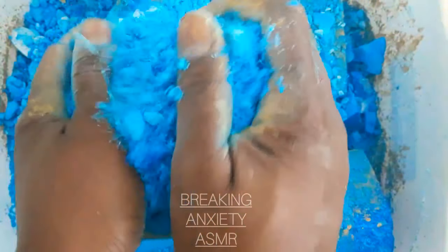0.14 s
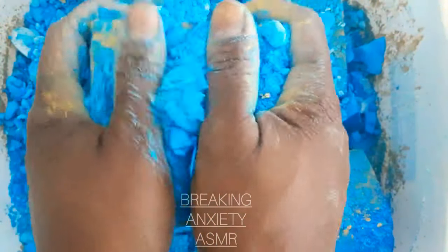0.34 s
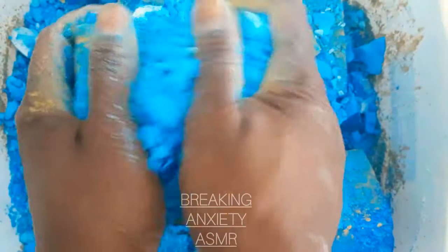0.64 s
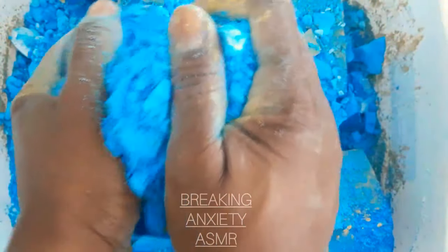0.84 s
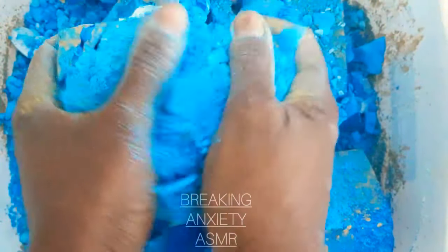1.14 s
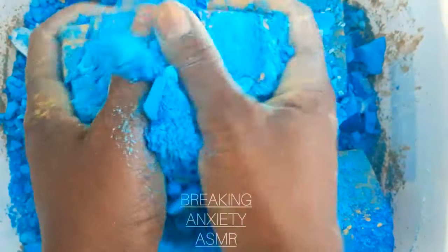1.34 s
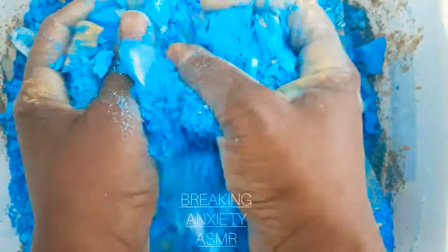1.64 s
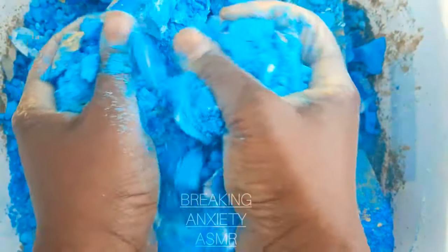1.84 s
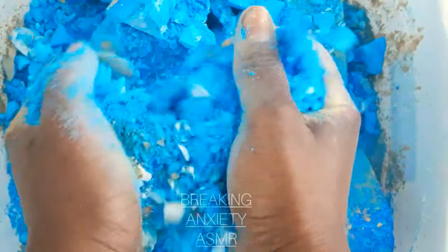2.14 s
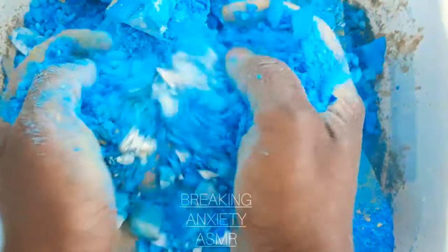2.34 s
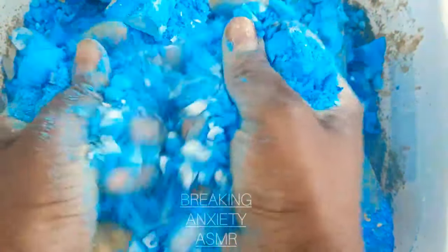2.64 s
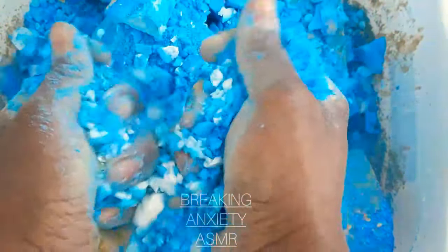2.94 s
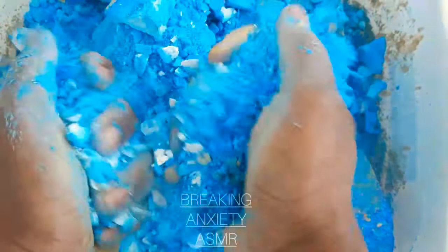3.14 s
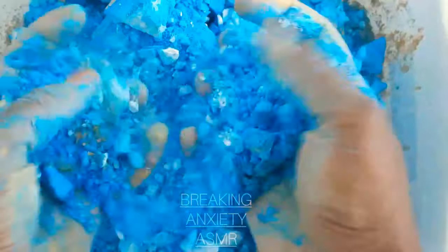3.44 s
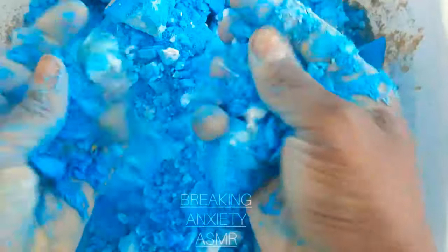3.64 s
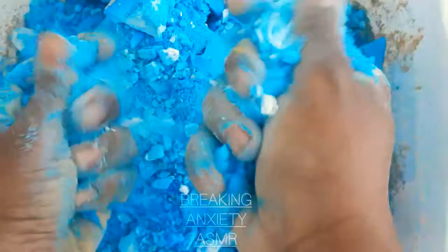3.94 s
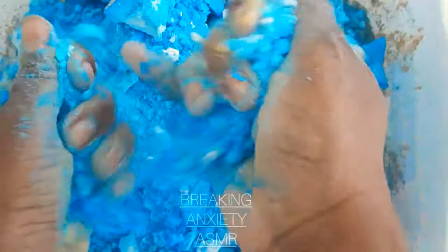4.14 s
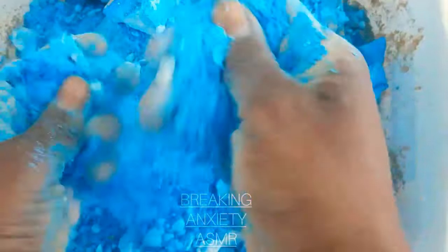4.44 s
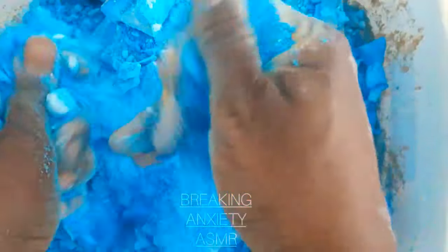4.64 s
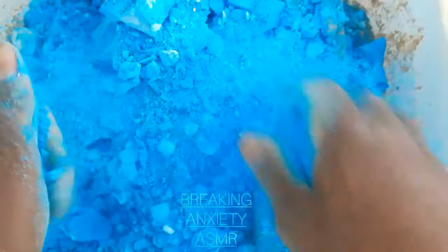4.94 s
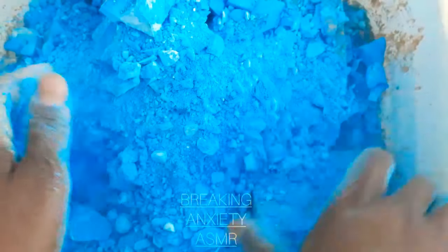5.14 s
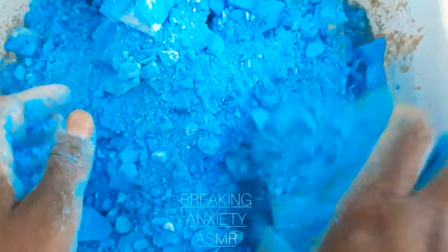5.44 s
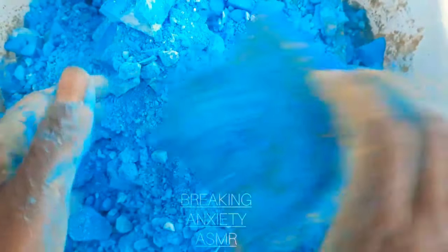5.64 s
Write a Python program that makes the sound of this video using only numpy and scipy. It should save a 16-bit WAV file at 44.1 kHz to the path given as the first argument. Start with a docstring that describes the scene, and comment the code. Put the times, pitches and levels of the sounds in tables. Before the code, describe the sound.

Two hands crush dry chalk blocks close to the microphone in a quiet room. Sharp, brittle snaps and gritty crunching come in irregular squeezes, busiest during the first two seconds. Lumps knock into a plastic tray below, and showers of crumbs patter with a soft low rumble. The crunching then grows lighter, with scattered cracks, a loud knock midway and a cluster of thuds near the end.

```python
"""A quiet room, the microphone close to two hands crushing dry chalk blocks over a plastic tray.
The chalk splits with sharp snaps and grinds into a crackle of grit; a few hard chips ring.
Lumps drop into the tray and knock on it, and the rain of small crumbs keeps its bottom rumbling.
Quick echoes come off the hands and the tray walls, with a faint room tail and hush behind."""
import sys
import numpy as np
from scipy import signal
from scipy.fft import rfft, irfft
from scipy.io import wavfile

SR = 44100
rng = np.random.default_rng(int(sys.argv[2]) if len(sys.argv) > 2 else 0)


def generate_wav(signal):
    """Clip the signal to [-1, 1] and save it as 16-bit WAV at the path in sys.argv[1]."""
    frames = np.transpose(np.atleast_2d(signal))
    scaled = np.clip(frames, -1, 1) * 32767
    pcm = np.round(scaled).astype(np.int16)
    wavfile.write(sys.argv[1], SR, pcm)


N = 254898
TIME = np.arange(N) / SR
STEPS = np.arange(0, N / SR + .002, .002)  # 2 ms grid for slow movements


def fracture(hz, cycles=0.5, splinter_db=-13, splinter_s=0.00095, splinter_width=1.7):
    """A crack runs in three quick steps, each a short click, trailed by splinters of like pitch."""
    t = np.arange(700) / SR
    gap, step_pitch, phase = rng.random((3, 3, 1))
    gap_s = .0003 + .0009 * gap
    since = np.maximum(t - np.cumsum(gap_s, axis=0) + gap_s[0], 0)
    turns = since * hz * 2 ** (.6 * (step_pitch - .5))
    age = turns / cycles
    envelopes = np.array([[.8], [.5], [.3]]) * (age * np.exp(1 - age)) ** 2
    clicks = envelopes * np.sin(2 * np.pi * (turns + phase))
    band = signal.butter(1, [hz / splinter_width, min(hz * splinter_width, .45 * SR)], "bandpass", fs=SR)
    splinters = unit(signal.lfilter(*band, rng.laplace(size=len(t)))) * np.exp(-t / splinter_s)
    return clicks.sum(0) + amp(splinter_db) * splinters


def snaps(chip_level_db, chip_count=300, chip_hz=3900, chip_octaves=0.72, chip_spread_db=9):
    """Loud brittle fractures, and between them small chips that break off as hard as the hands press."""
    # The loudest fractures. Each row: start in seconds, level in dB, pitch in Hz.
    breaks = [(.002, -2.5, 6000), (0.0553, -4, 5050), (.0611, 1, 3600), (0.3172, -4.5, 3960),
              (0.3484, -10.5, 3860), (0.4127, -13, 5570), (.4404, -6.5, 3660), (.5011, -8.5, 5440),
              (0.615, -15, 3830), (.6319, -14, 3900), (0.6545, -15.5, 4450), (0.6686, -14, 4100),
              (.69, -12, 3930), (0.711, -13.5, 4400), (0.7338, -10, 3700), (0.7712, -9, 4240),
              (0.809, -20.5, 2900), (.8376, -19.5, 3500), (.9176, -25, 4160), (0.9413, -12, 4200),
              (0.9722, -6.5, 3370), (1.014, -14.5, 4030), (1.1364, -17, 5650), (1.277, -20, 5100),
              (1.3726, -13, 5100), (1.4908, -6.5, 7900), (1.6351, -12.5, 5200), (1.726, -6, 2840),
              (1.831, -5, 3350), (1.8739, -4.5, 4050), (1.9698, -9.5, 4400), (2.06, -7, 5300),
              (2.0689, -4, 5500), (2.1507, -10.5, 5900), (2.7153, -22, 4820), (2.7872, -6.5, 6140),
              (2.8844, -9.5, 2310), (3.032, -12, 3770), (3.101, -15, 5050), (3.6376, -27, 2600),
              (3.8432, -18, 4830), (3.932, -10.5, 4900), (4.027, -16.5, 3100), (4.1495, -17, 5100),
              (4.2497, -21.5, 3800), (4.8029, -15, 4100), (4.858, -17.5, 2700), (5.137, -16, 7700)]
    out = np.zeros(N)
    for s, db, hz in breaks:
        add(out, s, amp(db) * fracture(hz))
    for k, (when, size, pitch) in enumerate(rng.random(size=(chip_count, 3))):
        at = int((k + when) / chip_count * N)
        db = chip_level_db[at] + chip_spread_db * size
        hz = chip_hz * 2 ** (chip_octaves * (2 * pitch - 1))
        add(out, at / SR, amp(db) * fracture(hz))
    return lowpass(highpass(out, 470, order=2), 8200, order=2)


def grit(grit_db, fineness, clump_db=4.5, clump_hz=170, powder=0.35):
    """Countless tiny fractures come in clumps as the chalk slips: broad cracks and pitched ticks."""
    # Pieces giving way in a burst of cracks. Each row: start in seconds, level in dB, decay in seconds.
    collapses = [(.05, -16, 0.0073), (0.0616, -13, 0.014), (0.074, -19.5, 0.017), (.09, -22.5, 0.048),
                 (.298, -25, 0.0067), (.437, -33, 0.043), (.766, -29.5, 0.0043), (.94, -39.5, .027),
                 (1.136, -32, 0.00082), (1.387, -33, 0.0096), (1.879, -29, 0.031), (2.147, -31, .0065),
                 (3.964, -32, 0.0064), (5.161, -32, 0.0049)]
    # The colour of breaking chalk. Each row: frequency in Hz, spectral density in dB.
    chalk_spectrum = [(100, -55), (300, -0.5), (600, 2), (1100, 1), (1600, -4.5), (2400, 0.5), (4000, 0),
                      (6000, 0), (8000, -7), (10000, -14.5), (12500, -25), (16000, -27)]
    collapsing = np.sqrt(sum(amp(db) ** 2 * (TIME >= s) * np.exp(-2 * np.maximum(TIME - s, 0) / decay)
                             for s, db, decay in collapses))
    grinding = amp(grit_db) * unit(amp(clump_db * drift(clump_hz)))
    cracks = impacts(per_s=5000, spread_db=4, cap=1.82)  # common to all bands
    edges_hz = np.geomspace(250, 17000, 12)
    out = np.zeros(N)
    for k, (lo, hi) in enumerate(zip(edges_hz, edges_hz[1:])):
        octaves = np.log2(np.sqrt(lo * hi) / 3800)
        level = np.hypot(grinding * amp(fineness * octaves), collapsing)  # finer grit is brighter
        dust = powder * rng.standard_normal(N)  # powder sliding between the fingers
        ticks = impacts(per_s=1200, spread_db=3.0, cap=8.4)
        band = signal.butter(2, [lo, hi], "bandpass", fs=SR, output="sos")
        out += (-1) ** k * signal.sosfilt(band, unit(cracks + ticks + dust) * level)
    return colour(out, chalk_spectrum) / np.std(colour(rng.standard_normal(N), chalk_spectrum))


def hands(grip_s=0.023, ease_db_per_s=134, open_s=5.2):
    """Grit level, fineness and chip level over time; the strongest squeeze sets the character."""
    # Squeezes of the hands. Each row: start and length in seconds, grit level in dB,
    # fineness as a tilt in dB per octave, smallest chips in dB above the grit.
    squeezes = [(0.022, 0.18, -42.5, 0, 18), (0.259, 0.27, -44, 0, 13.5), (0.583, 0.2, -45.5, 1.5, 22),
                (0.921, 0.058, -45, 0.8, -1), (1.233, 0.16, -45, -1, -6), (1.358, 0.45, -38, -1.5, -1),
                (1.549, 0.069, -31, -0.3, -10), (1.676, .31, -35.5, -0.1, 18.5), (2.066, 0.03, -32, .3, 9),
                (2.17, 0.46, -42.5, -0.5, 1), (2.529, 0.089, -39.5, -1.5, 2), (2.668, 0.35, -41.5, -1, 0),
                (3.51, 0.48, -47, -0.4, -2), (3.93, 0.023, -41, 0, -7), (4.131, 0.12, -48, 1.5, -17),
                (4.31, 0.24, -46.5, 0.1, 6), (4.537, 0.19, -43, -1.5, 2), (4.776, 0.23, -51.5, 1, 12),
                (5.051, .15, -41.5, -1, -13), (5.237, 0.045, -50.5, -6, -2), (5.403, 0.1, -62.5, -6.5, 17),
                (5.519, 0.17, -54.5, -3, -4)]
    clinging = (0, open_s, -53.5, 0.2, 8)  # chalk on the fingers rustles until the hands open
    rows = np.array(squeezes + [clinging])
    power = np.array([(amp(db) * swell(s, length, grip_s, ease_db_per_s)) ** 2
                      for s, length, db in rows[:, :3]]) + 1e-14
    total = power.sum(0)
    fineness, chips_db = rows[:, 3:].T @ power / total
    return [np.interp(TIME, STEPS, curve) for curve in (10 * np.log10(total), fineness, chips_db)]


def lumps():
    """Large pieces drop and knock on the tray."""
    # Landings. Each row: start in seconds, peak in dB, contact time in ms,
    # heft (extra for the deep modes) in dB, pitch of the struck spot in Hz.
    landings = [(.061, -11.5, 0.27, -15.5, 670), (0.0758, -11, 0.2, 3, 1310), (.165, -9, 3, -23, 172.5),
                (.499, -15, 0.93, -3, 437), (0.5145, -21, 2.2, 2, 212), (0.5595, -20, 2.4, -8, 480),
                (1.1714, -36.5, 0.69, 14, 173), (1.398, -26.5, 1.35, -7, 634), (1.4267, -6.5, 3.26, 9, 153),
                (1.513, -16, 2.2, 10, 234), (1.5376, -17, 0.79, 13, 208.4), (1.846, -21, 2.5, 6, 221),
                (1.882, -7, 1.8, 9, 1000), (2.0801, -15, 0.6, -3, 427), (2.1242, -17.5, 5, 20, 216),
                (2.1409, -17.5, 0.99, 9, 231), (2.3023, -21.5, 0.77, 10.5, 139),
                (2.7497, -8.5, 1.33, 0.5, 650), (2.792, -12.5, 0.84, 11, 176), (2.8833, -25, 0.4, -29, 648),
                (2.95, 2, 1.88, -15, 855), (2.9558, -2, 2.03, -7, 306), (2.9794, -21, 0.62, -3, 700),
                (3.0108, -12, 0.95, -42, 1150), (3.0369, -16, 0.86, 14, 151), (3.2004, -30, 3.2, 5.5, 185),
                (3.313, -32, 0.69, 9.5, 97), (3.639, -24, 0.57, 0, 1250), (3.7048, -27.5, 0.57, -6, 770),
                (3.966, -26, 1.85, -14, 546), (4.4875, -21, 0.72, 12.5, 170), (4.546, -34, .57, 27, 123),
                (4.6111, -18.5, 0.6, 10, 790), (4.6737, -25, 5.3, 29, 117), (4.8566, -25.5, .29, 6, 930),
                (4.921, -26, 0.61, -25, 113), (5.038, -7, 1.2, -6, 546), (5.0436, -6.5, 2.93, -17, 338),
                (5.0996, -7, 1.09, -33, 1016), (5.1596, -18, 0.28, 13, 1000), (5.2446, -24.5, 0.7, -10, 99),
                (5.267, -20.5, 3.4, 8, 630), (5.272, -5.5, 1.15, 23.5, 97.4), (5.3292, -20.5, 1.9, 30, 110),
                (5.646, -18, 0.82, -9, 615), (5.6947, -21, 0.65, -6, 840), (5.7325, -20.5, 1.02, -5, 362)]
    out = np.zeros(N)
    for s, db, contact_ms, heft_db, spot_hz in landings:
        add(out, s, amp(db) * tray_ring(contact_ms, heft_db, spot_hz))
    return out


def tray_ring(contact_ms, heft_db, spot_hz, spot_gain=0.51, jolt_db=-13):
    """The tray's answer to one blow, peak 1: a soft, long contact leaves out the high modes."""
    # Modes of the loaded tray. Each row: frequency in Hz, level in dB, t60 in seconds.
    tray_modes = [(69, -1.5, 0.054), (100, 3.5, 0.12), (117, -21.5, 0.053), (194.5, -2, 0.2),
                  (212, 9, 0.13), (273, 2, 0.0092), (370.7, -6.5, 0.13), (448, 7, 0.022),
                  (570.5, 14.5, 0.03), (690, 9, 0.031), (750, 6.5, 0.043), (869, 4, 0.029),
                  (1068, 8, 0.024), (1313, 5.5, 0.013), (1717, 18, 0.0065), (2330, 15, 0.022)]
    t = np.arange(SR // 5) / SR
    hz, db, t60 = np.array(tray_modes).T[:, :, None]
    depth = np.clip(np.log2(500 / hz) / 2, 0, 1.2)
    detune = .015 * rng.standard_normal(hz.shape)  # the load on the tray keeps shifting
    sign = (-1) ** (np.arange(len(tray_modes))[:, None] // 3)
    modes = sign * amp(db + heft_db * depth - 60 * t / t60) * np.sin(2 * np.pi * hz * (1 + detune) * t)
    jolt = amp(jolt_db) * rng.standard_normal(len(t)) * np.exp(-t / 0.039)  # loose chalk jumps
    ring = lowpass(modes.sum(0) + jolt, 1000 / contact_ms, order=3)
    turns = t * spot_hz
    flex = turns * np.exp(1 - turns) * np.sin(2 * np.pi * turns)  # the struck spot flexes briefly
    ring = ring / abs(ring).max() + spot_gain * flex
    ring = highpass(ring, 75.0, order=4)  # the tray is too small to radiate deep bass
    return ring / abs(ring).max()


def crumbs(per_s=20, contact_ms=3.07, heft_db=5, pour_s=0.016, settle_db_per_s=177, stray_db=-57.5):
    """Small pieces patter softly on four spots of the tray, in showers with strays between."""
    # Showers of crumbs. Each row: start and length in seconds, level in dB.
    showers = [(0.035, 0.35, -43.5), (1.365, 0.3, -30.5), (1.7, 0.52, -37), (2.202, 0.88, -36),
               (3.265, 0.446, -41.5), (3.76, 0.35, -49), (4.147, 1, -38.5), (4.524, 0.16, -29.5),
               (4.74, 0.24, -46), (5.128, 0.18, -31.5), (5.408, 0.31, -40)]
    patter = np.zeros(N)
    for spot_hz in (103, 124.5, 186.3, 224.5):
        hits = impacts(per_s, spread_db=3.5, cap=3.0)
        patter += signal.oaconvolve(hits, tray_ring(contact_ms, heft_db, spot_hz))[:N]
    power = sum((amp(db) * swell(s, length, pour_s, settle_db_per_s)) ** 2 for s, length, db in showers)
    return unit(patter) * np.interp(TIME, STEPS, np.sqrt(power + amp(stray_db) ** 2))


def clinks():
    """A hard chip that falls free rings for a moment at its own pitch."""
    # Ringing chips. Each row: start in seconds, peak in dB, pitch in Hz, t60 in seconds.
    chips = [(1.489, -23, 7050, 0.022), (2.838, -23.5, 4550, 0.012), (4.149, -42, 6170, 0.063),
             (4.254, -31, 6250, 0.027), (4.857, -27, 2630, 0.032), (4.857, -28, 4200, 0.014)]
    t = np.arange(SR // 8) / SR
    out = np.zeros(N)
    for s, db, hz, t60 in chips:
        add(out, s, amp(db - 60 * t / t60) * np.sin(2 * np.pi * hz * t))
    return out


def room(x, wet_db=-17, near_db=-16, near_decay_s=.004):
    """Adds quick echoes off the hands and the tray walls, then a faint short tail."""
    # The room's reverberation. Each row: frequency in Hz, t60 in seconds.
    decay_times = [(150, 0.36), (1000, 0.23), (4000, 0.31), (12000, 0.071)]
    t = np.arange(SR // 2) / SR
    hz, frame_s, frames = signal.stft(rng.standard_normal(len(t)) * (t > .005), SR, nperseg=256)
    decay = amp(-60 * frame_s / read(decay_times, hz)[:, None])
    tail = signal.istft(frames * decay, SR, nperseg=256)[1][:len(t)]
    near = rng.standard_normal(len(t)) * (t > .001) * np.exp(-t / near_decay_s)
    echo = amp(wet_db) * tail / np.linalg.norm(tail) + amp(near_db) * near / np.linalg.norm(near)
    return x + signal.oaconvolve(x, echo)[:N]


def hush(level_db=-64):
    """The faint steady noise of the still room."""
    # Room tone. Each row: frequency in Hz, relative spectral density in dB.
    hush_spectrum = [(25, -18), (90, -31), (250, 11), (700, 3.5), (2500, -3), (7000, -10), (16000, -24)]
    return amp(level_db) * unit(colour(rng.standard_normal(N), hush_spectrum))


def impacts(per_s, spread_db, cap):
    """Random clicks of either sign: many small, a few up to cap * spread_db dB larger."""
    size = amp(spread_db * np.minimum(rng.exponential(1, N), cap))
    return unit(size * rng.choice([-1, 1], N) * (rng.random(N) < per_s / SR))


def swell(start, length, rise_s, fall_db_per_s):
    """Attack, hold and release of one movement."""
    t = STEPS - start
    return np.clip(t / rise_s, 0, 1) * amp(-fall_db_per_s * np.maximum(t - length, 0))


def drift(hz):
    """Random wander below hz, rms 1."""
    return unit(lowpass(rng.standard_normal(N), hz, order=2))


def colour(x, spectrum, size=2048):
    """Minimum-phase filter with the given spectrum, so that clicks keep their sharp front."""
    log_gain = np.log(amp(read(spectrum, abs(np.fft.fftfreq(size, 1 / SR)))))
    taps = np.fft.ifft(np.exp(np.conj(signal.hilbert(log_gain)))).real
    return signal.oaconvolve(x, taps[:size // 2])[:len(x)]


def lowpass(x, hz, order):
    """Causal low-pass."""
    return signal.sosfilt(signal.butter(order, min(hz, .45 * SR), fs=SR, output="sos"), x)


def highpass(x, hz, order):
    """Causal high-pass."""
    return signal.sosfilt(signal.butter(order, hz, "highpass", fs=SR, output="sos"), x)


def read(points, hz):
    """Reads a table along a log-frequency axis."""
    point_hz, value = np.transpose(points)
    return np.interp(np.log(hz + 1), np.log(point_hz + 1), value)


def add(mix, s, sound):
    """Mixes a sound in at time s."""
    part = mix[max(round(s * SR), 0):][:len(sound)]
    part += sound[:len(part)]


def amp(db):
    """Decibels to gain."""
    return 10 ** (np.asarray(db) / 20)


def unit(x):
    """Scales to rms 1."""
    return x / np.sqrt(np.mean(x ** 2) + 1e-20)


def scene(width=0.13):
    """Chalk and tray sit close and central, heard almost in mono."""
    grit_db, fineness, chips_db = hands()
    chalk = grit(grit_db, fineness) + snaps(grit_db + chips_db) + clinks()
    mid = room(chalk + lumps() + crumbs()) + hush()
    treble = np.clip((np.fft.rfftfreq(N, 1 / SR) - 8000) / 2000, 0, 1)
    side = width * drift(44) * irfft(1j * rfft(mid) * treble, N)
    return np.array([mid + side, mid - side])


def record(dry, edge_hz=16300):
    """The loudest peaks clip at full scale; then a steep low-pass limits the band."""
    band_limit = signal.firwin(511, edge_hz, window=("kaiser", 9), fs=SR)
    return signal.oaconvolve(np.clip(dry, -1, 1), band_limit[None], "same")


dry = scene()
out = record(dry)
generate_wav(out)
```